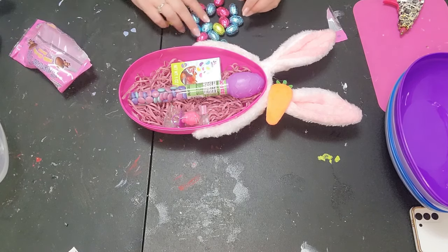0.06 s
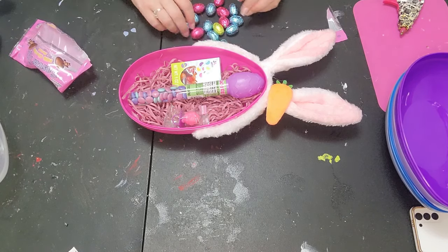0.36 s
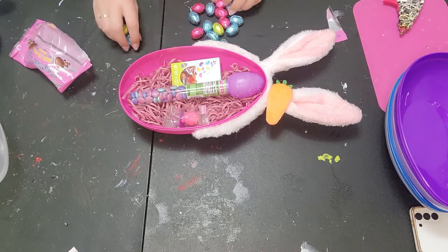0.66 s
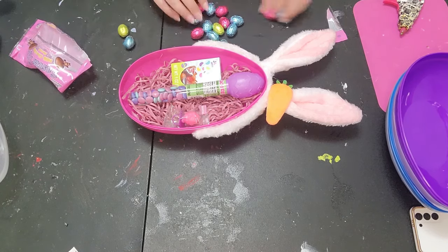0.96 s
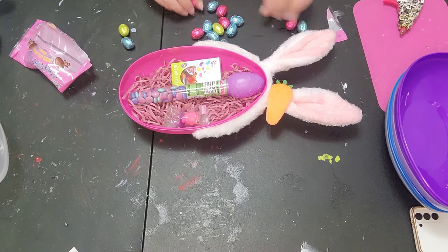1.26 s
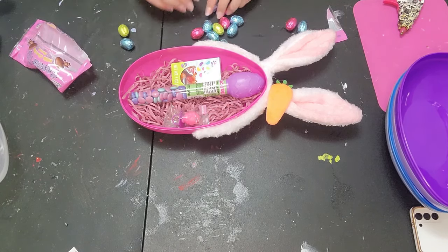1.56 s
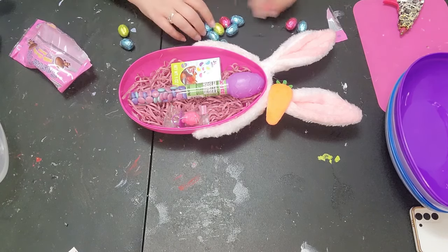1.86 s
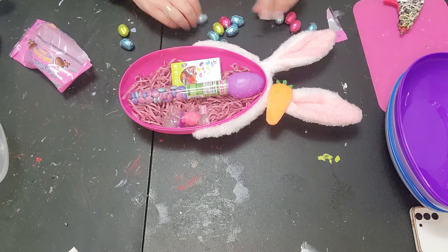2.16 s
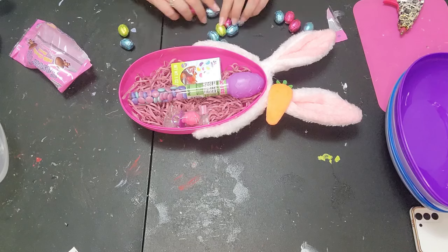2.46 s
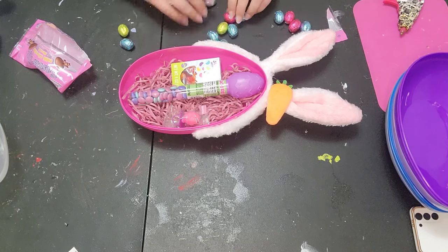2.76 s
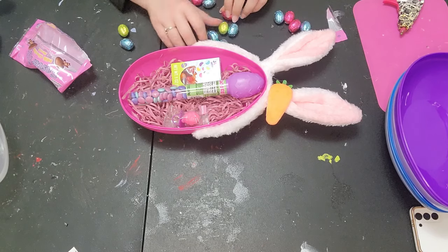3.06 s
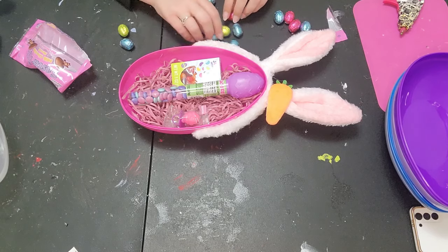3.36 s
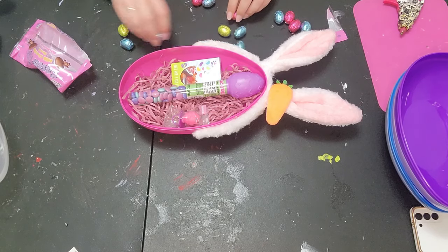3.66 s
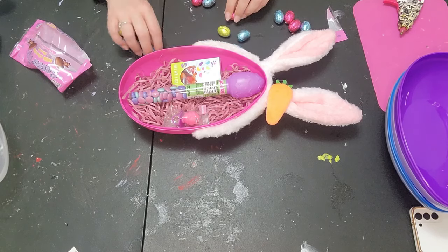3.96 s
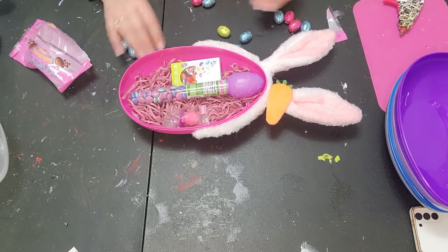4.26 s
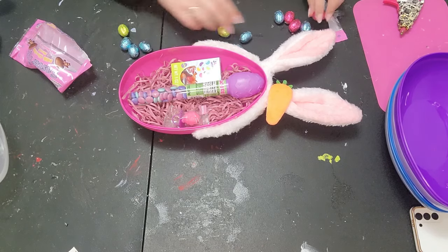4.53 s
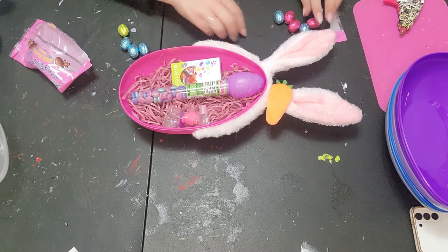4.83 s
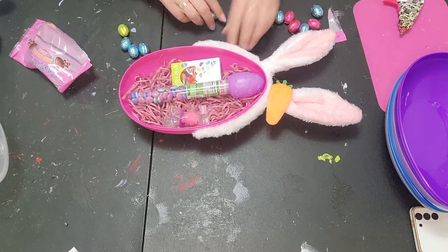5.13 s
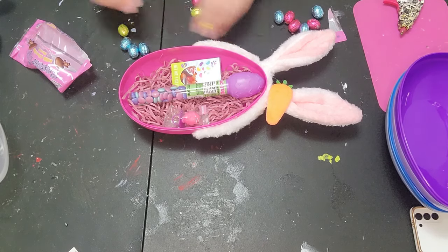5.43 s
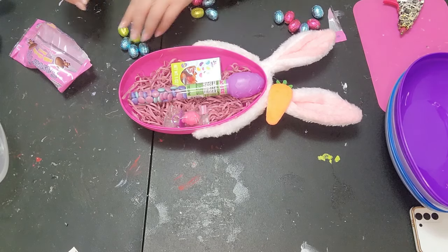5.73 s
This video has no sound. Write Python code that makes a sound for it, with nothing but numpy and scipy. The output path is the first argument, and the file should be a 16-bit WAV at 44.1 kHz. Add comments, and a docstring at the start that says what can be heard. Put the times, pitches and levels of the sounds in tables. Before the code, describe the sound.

Hands sort small foil-wrapped chocolate eggs on a large table, close under a microphone in a small, quiet room. The eggs are first pushed with a low rumble and ticking foil, and one rolls for about half a second. Irregular knocks follow as they are set down, each ringing the tabletop a little differently, between short slides and foil rasps. Near the end comes one bright, hard tap.

```python
"""Two hands sort small foil-wrapped chocolate eggs on a large table, under a microphone in a small room.
First eggs are pushed, rumbling over the worn paint while their foil rustles and ticks. Then eggs are
nudged and set down: they thump and ring the tabletop, differently at each place. Pressed foil rasps,
one egg takes a long roll, and a sticking fingertip makes the board hum. Pushes and landings go on,
and near the end something hard gets one bright tap."""
import sys
import numpy as np
from scipy import signal
from scipy.fft import rfft, irfft, next_fast_len
from scipy.io import wavfile
from scipy.ndimage import uniform_filter1d

SR = 44100
rng = np.random.default_rng(int(sys.argv[2]) if len(sys.argv) > 2 else 0)


def wrap_up_sound(samples):
    """Save the sound to the file named by the first command line argument, as 16-bit audio."""
    columns = np.atleast_2d(samples).T
    # keep every value between -1 and 1, then stretch to whole-number steps
    tamed = np.clip(columns, -1, 1)
    steps = np.round(tamed * 32767).astype(np.int16)
    wavfile.write(sys.argv[1], SR, steps)


N = 264423
TIME_S = np.arange(N) / SR


def amp(db):
    """Decibels to gain."""
    return 10 ** (np.asarray(db) / 20)


def unit(x):
    """Scales to rms 1."""
    return x / np.sqrt(np.mean(x ** 2) + 1e-20)


def read(points, hz):
    """Reads a table along a log-frequency axis."""
    points_hz, values = np.transpose(points)
    return np.interp(np.log(hz + 1), np.log(points_hz + 1), values)


def add(mix, at_s, sound):
    """Adds a sound to both channels."""
    part = mix[:, max(round(at_s * SR), 0):][:, :sound.shape[-1]]
    part += sound[..., :part.shape[1]]


def wander(shape, steps):
    """Smooth noise of rms 1, changing over the given steps per axis."""
    x = rng.standard_normal(shape)
    for axis, width in enumerate(steps):
        x = uniform_filter1d(uniform_filter1d(x, width, axis), width, axis)
    return unit(x)


def colour(x, spectrum, tilt_db=0, ripple_db=0, size=4096):
    """Minimum-phase filter of unit energy: a tilted spectrum with random peaks from foil creases."""
    hz = abs(np.fft.fftfreq(size, 1 / SR))
    creases_hz = np.geomspace(700, SR / 2, num=50)
    peaks = rng.standard_normal(len(creases_hz)) * signal.windows.tukey(len(creases_hz), .1)
    db = read(spectrum, hz) + tilt_db * np.log2(1 + hz / 2000)
    db += ripple_db * np.interp(hz, creases_hz, peaks)
    response = np.exp(np.conj(signal.hilbert(np.log(amp(db)))))
    taps = np.fft.ifft(response).real[:size // 2]
    return signal.oaconvolve(x, taps[None] / np.linalg.norm(taps), axes=1)[:, :x.shape[1]]


# microphone pair: (frequency [Hz], correlation [0-1])
MIC_CORRELATION = [(100, 0.99), (250, 0.95), (500, 0.93), (1000, 0.3), (2000, 0.48), (4000, 0.31),
                   (8000, 0.04)]
def pair(x):
    """Two unrelated signals become a microphone pair: alike in the bass, apart in the treble."""
    size = next_fast_len(x.shape[1])
    same = np.clip(read(MIC_CORRELATION, np.fft.rfftfreq(size, 1 / SR)), 0, 1)
    mid, side = rfft(x, size) * np.sqrt([(1 + same) / 2, (1 - same) / 2])
    return irfft(np.array([mid + side, mid - side]), size)[:, :x.shape[1]]


def noise(count):
    """White noise at the microphone pair."""
    return pair(rng.standard_normal((2, count)))


def grains(count, per_s, spread_db):
    """Tiny random contacts of uneven strength."""
    strength = amp(spread_db * np.minimum(rng.exponential(1, count), 4))
    hits = rng.random(count) < per_s / SR
    return unit(pair(strength * hits * rng.choice([-1., 1.], (2, count))))


# background spectrum: (frequency [Hz], density [dB])
BACKGROUND_SPECTRUM = [(25, -22), (50, -1.5), (135, -2.5), (180, 4), (400, 1), (800, -16), (2000, -24),
                       (5000, -27.5), (9000, -33.5), (16000, -28)]
def background(level_db=-57.5):
    """Quiet, steady, bass-heavy noise."""
    return amp(level_db) * colour(noise(N), BACKGROUND_SPECTRUM)


def gesture(length_s, swell_share=0.11, fade_share=0.78):
    """A hand movement swells, holds and fades; returns strength and progress."""
    progress = np.clip(TIME_S[:SR * 3 // 5] / length_s, 0, 1)
    ramp = np.clip(np.minimum(progress / swell_share, (1 - progress) / fade_share), 0, 1)
    return np.sin(np.pi / 2 * ramp), progress


def turning(rub, depth_db=3, size=512):
    """As an egg turns, other creases touch the table and shift the resonances of its rub."""
    spectra = signal.stft(rub, nperseg=size)[2]
    spectra *= amp(depth_db * wander(spectra.shape[1:], steps=(3, 7)))
    return unit(signal.istft(spectra, nperseg=size)[1][:, :rub.shape[1]])


# spectra of hand drag, foil and board rumble: (frequency [Hz], density [dB])
DRAG_SPECTRUM = [(40, -27.5), (75, -10.5), (99, 1), (117, -17.5), (136, 6.5), (160, -28), (300, -46.5)]
FOIL_SPECTRUM = [(300, -30.5), (700, 13.5), (1200, 7), (2000, 4), (2700, 0), (3700, 1), (4900, 4),
                 (6500, -9.5), (8000, -9.5), (10000, -20), (12500, -14), (15200, -21), (16200, -42)]
RUMBLE_SPECTRUM = [(110, -44), (200, 4), (280, 4), (370, -1.5), (550, 8), (720, -9.5), (900, -13.5),
                   (1400, -21.5), (2400, -54), (5000, -63)]
def slide(stroke, rumble_db, rustle_db, drag_db, tilt_db, clump_db=2.0):
    """The dragging hand stirs the lowest modes, the egg's foil rubs and its wrinkles bump the board."""
    count = len(stroke)
    friction = amp(drag_db) * stroke * grains(count, per_s=1200, spread_db=-0.5)
    drag = colour(friction, DRAG_SPECTRUM, size=16384)
    clumps = amp(clump_db * wander(count, steps=[SR // 90]))
    rub = turning(grains(count, per_s=1800, spread_db=3.8) * clumps)
    bumps = amp(rumble_db - 1) * stroke * grains(count, per_s=600, spread_db=2.0)
    rustle = colour(amp(rustle_db) * stroke * rub, FOIL_SPECTRUM, tilt_db)
    return drag + rustle + colour(bumps, RUMBLE_SPECTRUM, ripple_db=6)


def drone(hz, width_hz=105, per_s=540):
    """Tiny contacts under a moving egg feed one resonance that follows the pitch curve."""
    carrier = np.exp(2j * np.pi * np.cumsum(hz) / SR)
    pole = np.exp(-np.pi * width_hz / SR)
    contacts = grains(len(hz), per_s, spread_db=-1.0)
    baseband = signal.lfilter([1], [1, -2 * pole, pole * pole], contacts / carrier)
    return unit((carrier * baseband).real)


# pushes: (time [s], length [s], rumble [dB], rustle [dB], hand drag [dB], foil tilt [dB/octave])
EGG_PUSHES = [(0.0, 0.19, -50, -53, -52, -6), (0.18, 0.135, -41, -48, -48.5, 1),
              (0.61, 0.1, -36.5, -50.5, -38, 0.5), (1.171, 0.071, -47, -43, -43, 1),
              (1.469, 0.48, -48.5, -65.5, -54.5, 4), (1.702, 0.095, -36, -52.5, -66, -1),
              (1.915, 0.2, -38.5, -52.5, -44.5, -6.5), (2.056, 0.086, -41.5, -53.5, -66, 0.5),
              (2.148, 0.26, -43, -65.5, -51, 14), (2.367, 0.23, -44.5, -63, -51, -1.5),
              (2.466, 0.088, -43.5, -53.5, -64, -6.5), (2.569, 0.27, -40.5, -59, -71, 7),
              (2.948, 0.16, -48.5, -62.5, -54.5, 1), (3.094, 0.16, -43, -56, -52, -1.5),
              (3.222, 0.24, -39, -56.5, -46.5, 0.5), (3.41, 0.19, -39, -58, -50.5, -3),
              (4.08, 0.14, -46.5, -60.5, -47, -3), (4.695, 0.15, -38, -53, -49.5, -9.5),
              (5.225, 0.08, -32.5, -41, -36.5, -5), (5.566, 0.05, -51, -46.5, -43, -11.5),
              (5.852, 0.083, -48.5, -53, -50, -6), (5.966, 0.041, -37.5, -44.5, -37, -6.5)]
def pushes(usual_hz=373, usual_db=-37, load_hz_per_db=12, sag_share=0.25):
    """An egg slides over the paint; its drone is lower under a heavy push and sinks as it slows."""
    out = np.zeros((2, N))
    for at_s, length_s, rumble_db, rustle_db, drag_db, tilt_db in EGG_PUSHES:
        stroke, progress = gesture(length_s)
        start_hz = usual_hz - load_hz_per_db * (rumble_db - usual_db)
        add(out, at_s, slide(stroke, rumble_db, rustle_db, drag_db, tilt_db))
        add(out, at_s, amp(rumble_db - 5) * stroke * drone(start_hz * (1 - sag_share * progress)))
    return out


def crunch(snap_s, settle_s, settle_db, tilt_db, rise_s):
    """Foil creases snap at the contact and settle just after it."""
    t = TIME_S[:SR // 12]
    decay = np.exp(-t / snap_s) + amp(settle_db) * np.exp(-t / settle_s)
    envelope = decay * (1 - np.exp(-t / rise_s))
    return colour(noise(len(t)) * envelope, FOIL_SPECTRUM, tilt_db, ripple_db=3.2)


# foil ticks: (time [s], level [dB], tilt [dB/octave])
FOIL_TICKS = [(0.193, -39, -5), (0.2268, -37, 0.5), (0.266, -31, -8.5), (0.487, -48.5, 7.5),
              (0.584, -34, -2.5), (0.605, -36.5, 5), (1.401, -31.5, 7.5), (1.543, -39, 3.5),
              (2.361, -35.5, 2), (2.484, -35.5, -8.5), (2.579, -43, 2), (3.121, -39, -5),
              (3.253, -36.5, -3), (3.315, -34, -1), (3.331, -33, 1), (3.364, -39, 0), (3.438, -43, 3),
              (3.478, -38, -2), (3.816, -38.5, 21), (4.135, -37.5, -6.5), (4.509, -50, 4.5),
              (4.634, -32.5, 7), (5.792, -48, 16), (5.94, -36.5, 3.5), (5.947, -29.5, -3.5)]
def ticks():
    """Light contacts with another egg or a fingernail sound the foil alone."""
    out = np.zeros((2, N))
    for at_s, level_db, tilt_db in FOIL_TICKS:
        tick = crunch(snap_s=0.00094, settle_s=0.016, settle_db=-11.0, tilt_db=tilt_db, rise_s=0.00016)
        add(out, at_s, amp(level_db) * tick)
    return out


def thump(hz, best_hz=364, octave_off_db=-13, crest_s=0.0023):
    """The board flexes under the egg for a few milliseconds, most readily at one pitch."""
    t = TIME_S[:SR // 20]
    envelope = (t / crest_s * np.exp(1 - t / crest_s)) ** 2
    gain = amp(4.5 + octave_off_db * np.log2(hz / best_hz) ** 2)
    return -gain * envelope * np.sin(2 * np.pi * hz * t)


# chocolate shell spectrum: (frequency [Hz], density [dB])
SHELL_SPECTRUM = [(250, -25), (600, -8), (900, 4.5), (1150, 1.5), (1600, -7.5), (2600, -22), (6000, -45.5)]
def clack(rise_s, decay_s=0.0037):
    """The hard shell answers with a brief, unpitched clack."""
    t = TIME_S[:SR // 12]
    envelope = np.exp(-t / decay_s) * (1 - np.exp(-t / rise_s))
    return unit(colour(noise(len(t)) * envelope, SHELL_SPECTRUM)) * np.sqrt(np.mean(envelope ** 2))


# tabletop modes: (frequency [Hz], t60 [s], struck left [dB], struck middle [dB], struck right [dB])
BOARD_MODES = [(97, 0.22, -23, -11.5, -38), (135.2, 0.42, -4.5, -17, -33), (208.3, 0.14, -13, -11.5, -48),
               (273, 0.18, -18, -13.5, -16), (334.2, 0.15, 10.5, -35.5, -12), (393.7, 0.1, -45, -8, -2.5),
               (452, 0.33, -20, -26, -17.5), (536, 0.175, 0, -15, -12.5), (635, 0.066, -40, 0, -47),
               (734.4, 0.18, -6, -19, -17), (934, 0.11, -13.5, -20, -19), (1149, 0.039, -30, -27, -23),
               (1331, 0.028, -17, -15.5, -32)]
def tabletop(place, rise_s, apart_hz=620):
    """The board rings; the strength of each mode depends on where it is struck."""
    t = TIME_S[:SR * 3 // 4]
    ring = np.zeros((2, len(t)))
    for k, (hz, t60_s, *place_db) in enumerate(BOARD_MODES):
        envelope = amp(np.interp(place, np.arange(3), place_db) - 60 * t / t60_s)
        detune = 1 + .008 * rng.standard_normal()  # resting hands load the board
        # short waves reach the two microphones out of step
        skew_rad = np.array([[.5], [-.5]]) * np.tanh((hz / apart_hz) ** 2 * 2) * (-1) ** k
        ring += (-1) ** k * envelope * np.sin(2 * np.pi * hz * detune * t + skew_rad)
    return ring * (1 - np.exp(-t / rise_s))


def landing(out, at_s, blow_db, place, hz, clack_db, foil_db, touch_s=0.0047):
    """One egg lands: foil brush, soft first touch, then thump, clack, foil snap and board ring."""
    contact_s = 0.00099 * amp(-blow_db / 2)  # foil cushions a gentle landing for longer
    flex = thump(hz)
    brush = crunch(snap_s=0.0089, settle_s=0.013, settle_db=-6.5, tilt_db=-9.0, rise_s=0.02)
    snap = crunch(snap_s=0.0027, settle_s=0.012, settle_db=-12.5, tilt_db=1.36, rise_s=contact_s)
    add(out, at_s - 2 * touch_s, amp(blow_db + foil_db - 25) * brush)
    add(out, at_s - touch_s, amp(blow_db - 26) * flex)
    add(out, at_s, amp(blow_db) * flex)
    add(out, at_s, amp(blow_db + clack_db - 12.5) * clack(contact_s))
    add(out, at_s, amp(blow_db + foil_db - 20.5) * snap)
    add(out, at_s, amp(blow_db - 2.5) * tabletop(place, contact_s))


# eggs nudged: (time [s], blow [dB])
EGG_NUDGES = [(0.378, -41), (1.755, -33), (2.958, -38.5), (3.146, -34.5), (3.438, -30), (3.721, -32),
              (4.094, -40.5), (4.259, -43), (4.381, -41), (4.502, -52), (4.991, -45.5), (5.408, -45.5),
              (5.565, -38.5), (5.691, -31), (5.967, -28)]
# eggs set down: (time [s], blow [dB], place [0 left, 2 right], thump [Hz], clack [dB], foil [dB])
EGG_LANDINGS = [(0.552, -14.5, 1.32, 395, -2, 0.5), (0.623, -22.5, 0.59, 547, 15, 10),
                (1.042, -29, 1.5, 373, -16, -10), (1.407, -17.5, 1.2, 432, 7, 14),
                (1.474, -24.5, 1.01, 484, 2, 3.5), (1.952, -18.5, 0.48, 286, -16, -4),
                (1.989, -19.5, 0.42, 312, 5, 6), (1.9935, -21, 0.95, 343, -9, 6),
                (2.36, -26.5, 1.1, 492, 10, -6), (2.649, -28, 0.96, 540, 8, 16),
                (2.7092, -10.5, 1.68, 470, 8.5, 4), (3.276, -21, 1.57, 477, -11, 3),
                (3.497, -24.5, 2.5, 400, 5, 8), (3.839, -14, 0.43, 410, 10.5, 2.5),
                (3.877, -23.5, 0.3, 380, 15, 17), (4.638, -14.5, 1, 622, -5, 0),
                (4.6427, -12, 0.97, 674, -9, 1), (4.6473, -25.5, 1, 636, -12, -9),
                (4.707, -28, 0.38, 370, 10, 15), (5.078, -7, 1.62, 417, 6, 6),
                (5.7196, -11, 0.36, 372, 8, 12), (5.79, -25.5, 0.43, 386, 8, -3)]
def knocks():
    """Eggs are set down one by one; nudged eggs tip over and bump the board lightly."""
    out = np.zeros((2, N))
    for row in EGG_LANDINGS:
        landing(out, *row)
    for at_s, blow_db in EGG_NUDGES:
        landing(out, at_s, blow_db, place=1.86, hz=426, clack_db=-6, foil_db=4)
    return out


# foil rasps: (time [s], length [s], level [dB], band centre [Hz])
FOIL_RASPS = [(0.616, 0.035, -48.5, 5060), (0.73, 0.27, -61.5, 4350), (1.712, 0.068, -62, 4650),
              (3.22, 0.061, -55, 4900), (3.339, 0.23, -58, 4900), (4.551, 0.11, -64.5, 5400),
              (4.701, 0.17, -57.5, 4920), (5.243, 0.039, -43, 5200), (5.864, 0.039, -59, 3080)]
def rasps(waver_share=0.057):
    """Pressed foil rasps in one wavering band."""
    out = np.zeros((2, N))
    for at_s, length_s, level_db, centre_hz in FOIL_RASPS:
        stroke, _ = gesture(length_s)
        hz = centre_hz * (1 + waver_share * wander(len(stroke), steps=[SR // 40]))
        add(out, at_s, amp(level_db) * stroke * drone(hz, width_hz=1300, per_s=2500))
    return out


# course of the long roll: (time [s], rumble [dB], rustle [dB], drone [Hz])
ROLL_CURVE = [(0.681, -46.5, -54.5, 306), (0.83, -41, -51, 393), (0.901, -37, -47, 382),
              (0.959, -33.5, -39, 357), (1.012, -44.5, -59, 322), (1.042, -36, -51, 350),
              (1.112, -38, -50, 312), (1.144, -46.5, -58.5, 318), (1.2, -36.5, -47, 320)]
def roll(ease_s=0.02):
    """One egg rolls a long way; each shove raises the pitch, which then sinks."""
    times_s, *columns = np.transpose(ROLL_CURVE)
    start_s, end_s = times_s[0], times_s[-1]
    t = start_s + TIME_S[:SR * 3 // 5]
    rumble_db, rustle_db, hz = (np.interp(t, times_s, column) for column in columns)
    stroke = np.clip(np.minimum(t - start_s, end_s - t) / ease_s, 0, 1)
    out = np.zeros((2, N))
    add(out, start_s, slide(stroke, rumble_db, rustle_db, drag_db=-55.5, tilt_db=-1))
    add(out, start_s, amp(rumble_db + 1.5) * stroke * drone(hz))
    return out


# fingertip judders: (time [s], length [s], level [dB], pitch [Hz])
FINGER_JUDDERS = [(1.17, 0.057, -36, 141), (4.099, 0.22, -40, 135.7)]
def judders(waver_share=0.019):
    """A sticking fingertip makes the board hum."""
    out = np.zeros((2, N))
    for at_s, length_s, level_db, centre_hz in FINGER_JUDDERS:
        stroke, _ = gesture(length_s)
        hz = centre_hz * (1 + waver_share * wander(len(stroke), steps=[SR // 40]))
        add(out, at_s, amp(level_db) * stroke * np.sin(2 * np.pi * np.cumsum(hz) / SR))
    return out


# modes of the tapped object: (frequency [Hz], level [dB], t60 [s])
TAP_MODES = [(1425, -4.5, 0.019), (1534, -5.5, 0.017), (3070, -11, 0.0088)]
def tap(at_s=5.9398, gain_db=-20.5):
    """Something hard is tapped once and rings briefly."""
    out, t = np.zeros((2, N)), TIME_S[:SR // 10]
    for hz, level_db, t60_s in TAP_MODES:
        add(out, at_s, amp(gain_db + level_db - 60 * t / t60_s) * np.sin(2 * np.pi * hz * t))
    return out


# room decay: (frequency [Hz], t60 [s])
ROOM_DECAY = [(80, 1), (210, 0.12), (560, 0.35), (1470, 0.31), (4500, 0.26), (10000, 0.17), (16000, 0.27)]
# near echoes: (delay [s], level [dB])
ROOM_ECHOES = [(.006, -11.5), (.0087, -14), (0.0115, -14.5), (0.0179, -13.5)]
def room(x, echo_db=1, tail_db=-8, treble_db=4, rise_s=0.00018):
    """A few near echoes and a short diffuse tail, stronger for the widely radiating foil."""
    t = TIME_S[:SR * 3 // 4]
    hz, age_s, spectra = signal.stft(noise(len(t)), SR, nperseg=256)
    t60_s = read(ROOM_DECAY, hz)[:, None]
    shelf_db = treble_db * (hz / (hz + 2000))[:, None]
    energy_norm = np.sqrt(2 * np.log(1000) / (t60_s * SR))
    spectra *= amp(shelf_db - 60 * age_s / t60_s) * energy_norm
    tail = signal.istft(spectra, SR, nperseg=256)[1][:, :len(t)]
    response = amp(tail_db) * tail * (1 - np.exp(-t / rise_s))
    for delay_s, level_db in ROOM_ECHOES:
        for channel, lag_s in enumerate(rng.uniform(-0.00015, 0.00021, 2)):
            response[channel, round((delay_s + lag_s) * SR)] += amp(level_db + echo_db)
    return x + signal.fftconvolve(x, response, axes=1)[:, :N]


def scene():
    """The table sounds in the room, slightly to the right, over a quiet background."""
    floor = background()
    table = knocks() + ticks() + pushes() + roll() + rasps() + judders() + tap()
    return room(table) * amp([[-.7], [.6]]) + floor


def record(dry, low_cut_hz=48, high_cut_hz=16150):
    """The microphone's bass roll-off and the recorder's band limit."""
    highpass = signal.butter(2, low_cut_hz, "highpass", fs=SR, output="sos")
    lowpass = signal.firwin(511, high_cut_hz, window=("kaiser", 9), fs=SR)
    return signal.oaconvolve(signal.sosfilt(highpass, dry), lowpass[None], "same")


dry = scene()
out = record(dry)
wrap_up_sound(out)
```